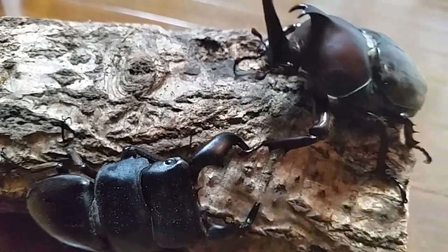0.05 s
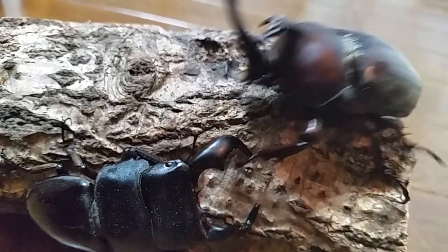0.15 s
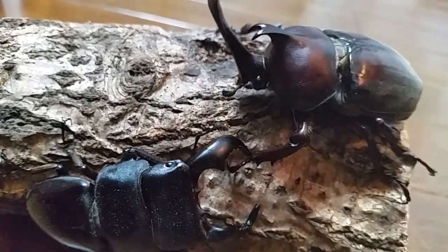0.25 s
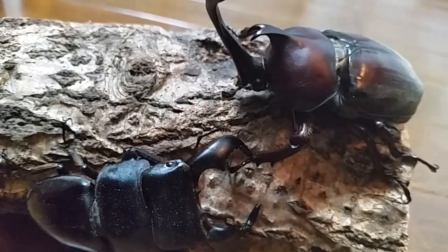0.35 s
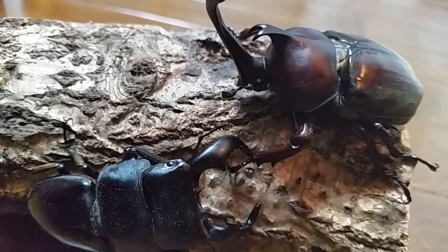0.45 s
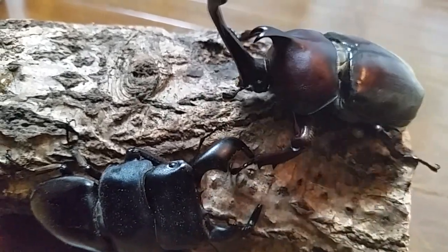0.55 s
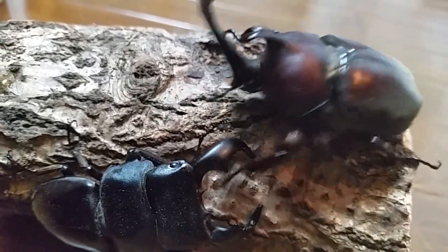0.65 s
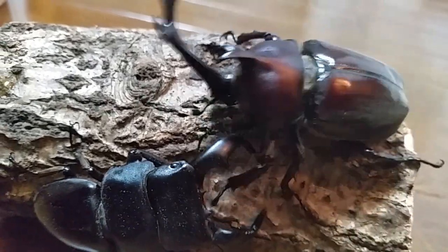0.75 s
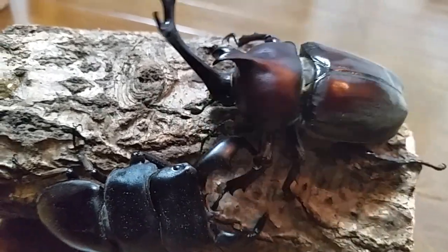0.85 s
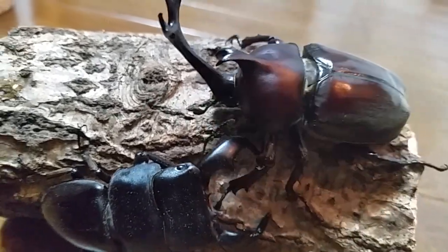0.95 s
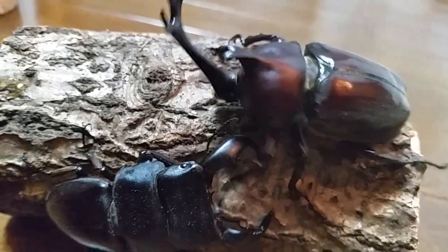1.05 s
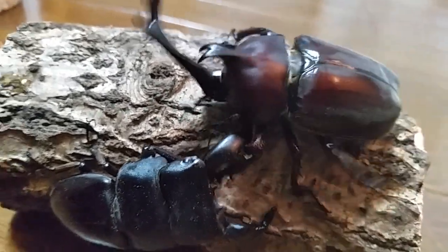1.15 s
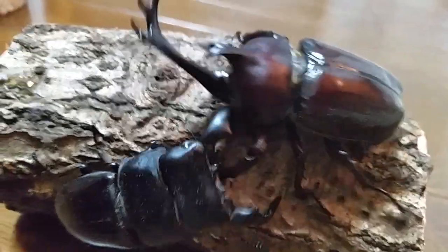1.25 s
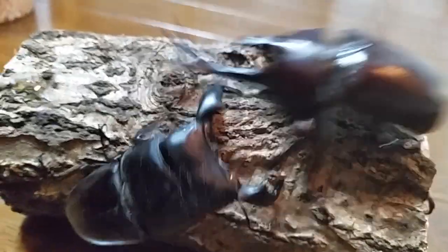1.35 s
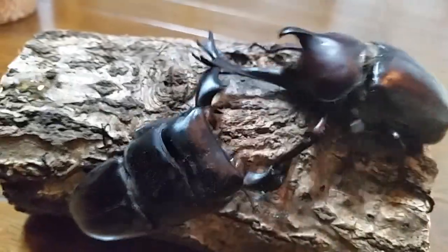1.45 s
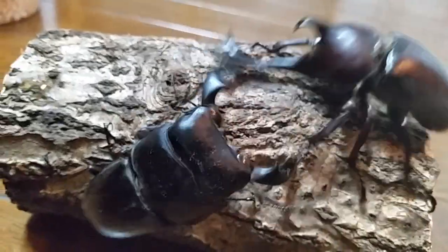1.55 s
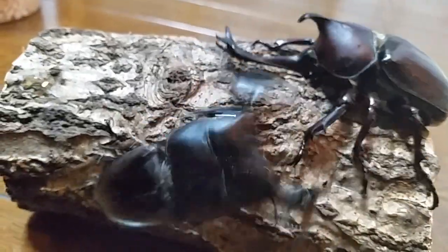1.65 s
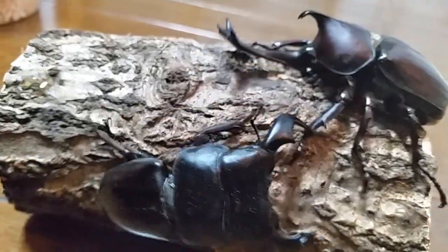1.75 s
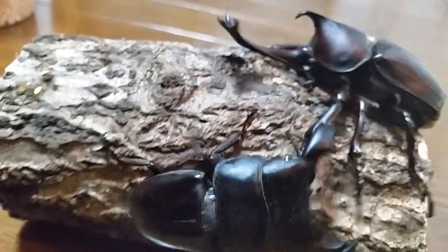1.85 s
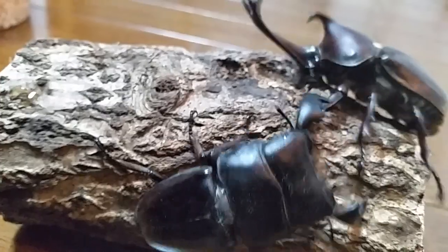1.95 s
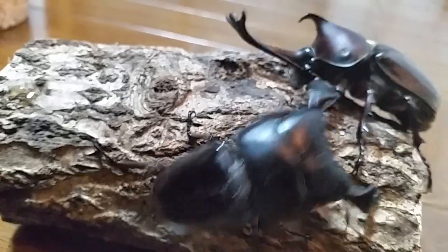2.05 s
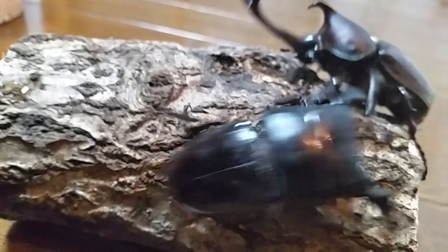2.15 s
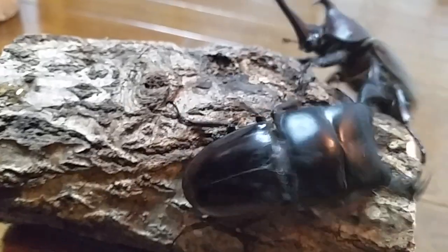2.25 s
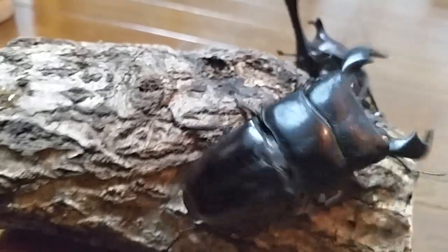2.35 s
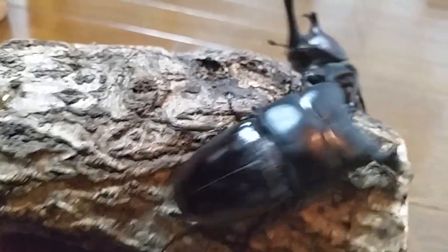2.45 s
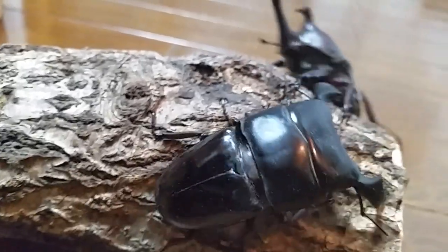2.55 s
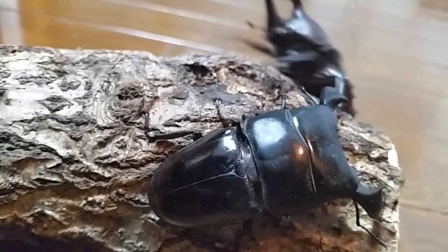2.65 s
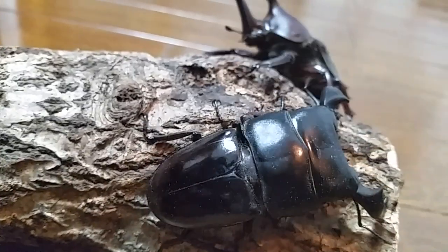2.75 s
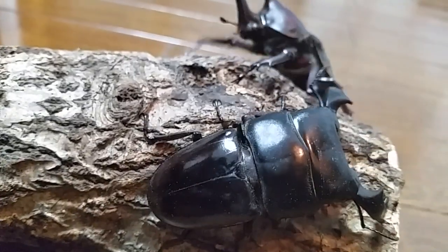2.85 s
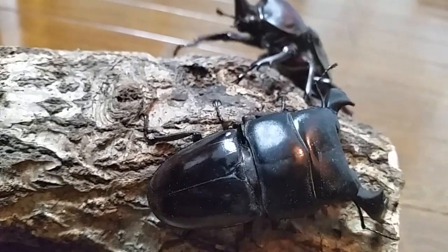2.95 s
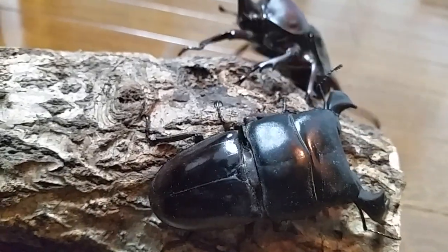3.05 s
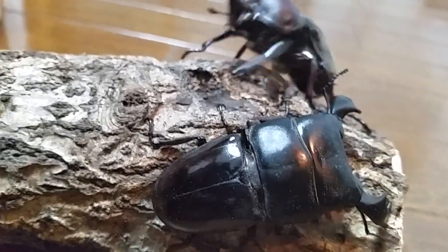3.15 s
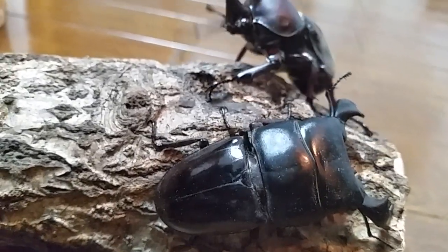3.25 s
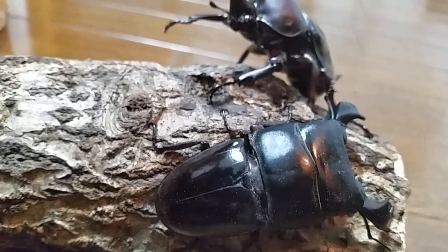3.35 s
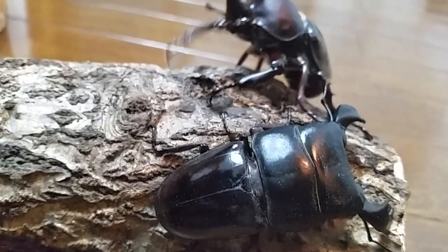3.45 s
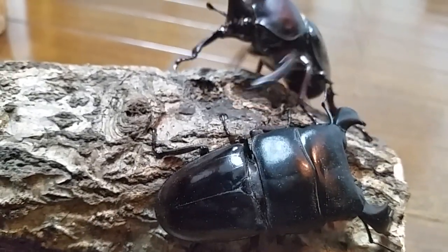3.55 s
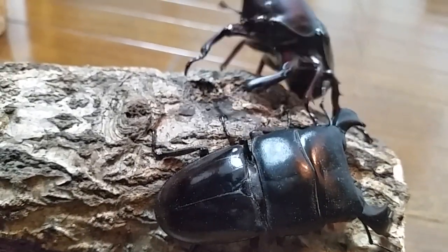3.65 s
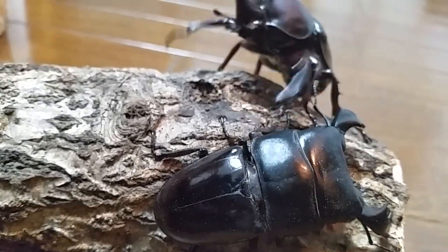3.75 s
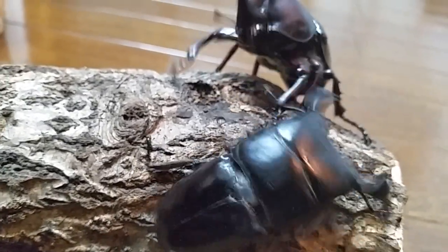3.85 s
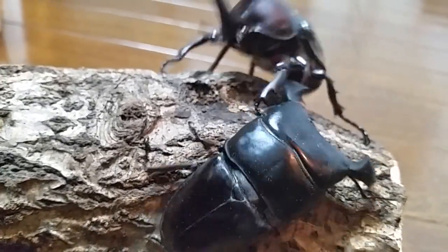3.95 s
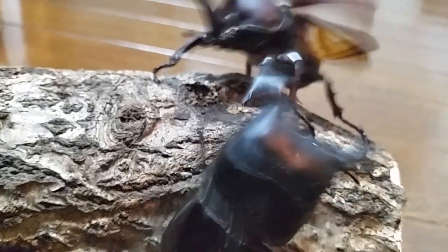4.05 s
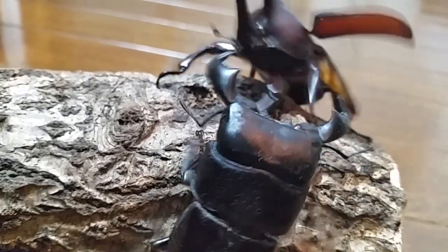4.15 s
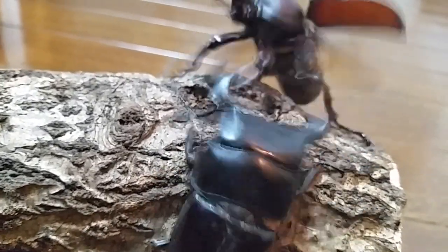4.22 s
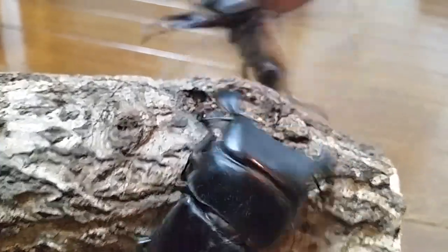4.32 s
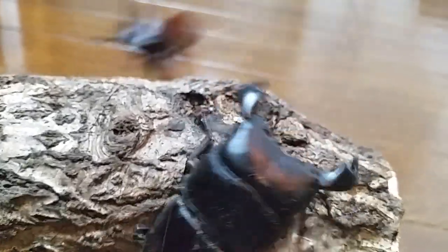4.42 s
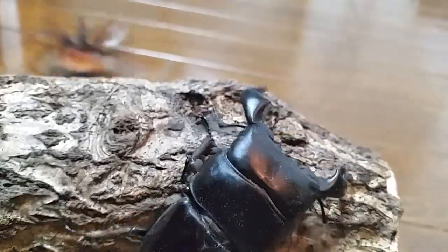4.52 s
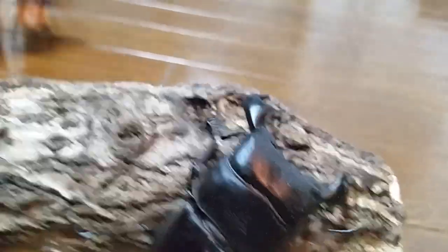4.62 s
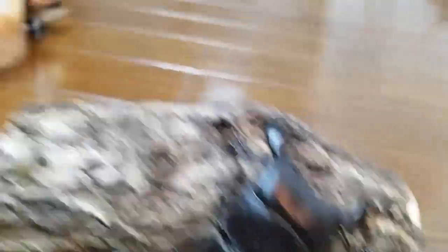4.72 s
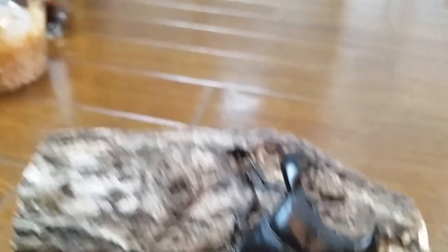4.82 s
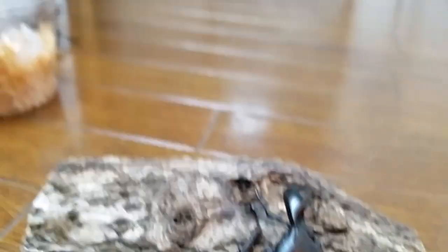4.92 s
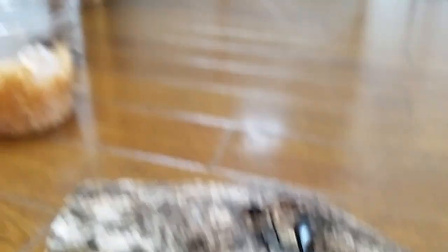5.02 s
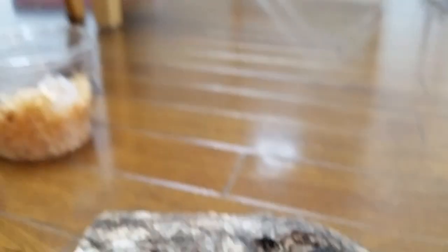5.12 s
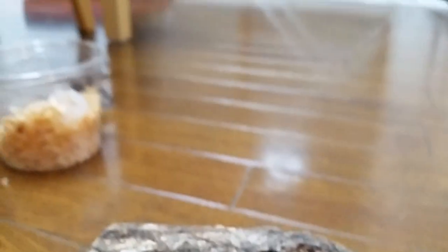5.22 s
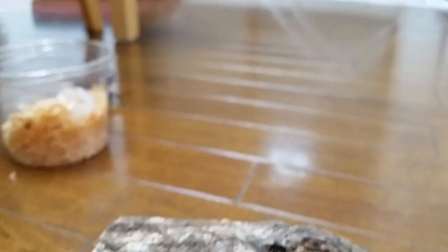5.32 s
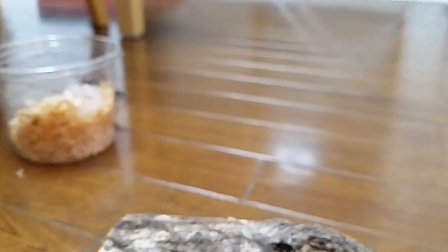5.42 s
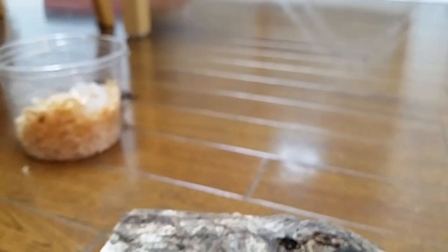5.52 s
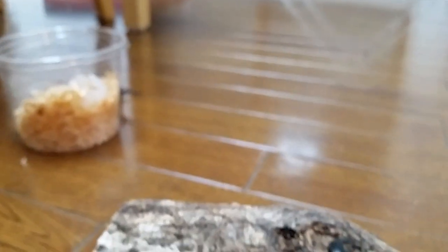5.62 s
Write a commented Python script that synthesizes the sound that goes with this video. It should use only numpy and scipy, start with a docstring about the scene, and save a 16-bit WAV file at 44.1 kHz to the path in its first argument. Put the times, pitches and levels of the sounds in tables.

```python
"""Beetle fight on a log

Two large beetles fight on a bark log on a wooden floor, close to a hand-held phone with two mic ports.
Claws tick and scrape; one beetle takes off, its wings humming and slapping log and floor at the
wing-beat rate, and its shell skids on the boards. Fingers bump the phone; a quiet room rumbles behind."""
import sys
import numpy as np
from scipy import signal
from scipy.fft import rfft, irfft
from scipy.io import wavfile
from scipy.ndimage import uniform_filter1d

SR = 44100
rng = np.random.default_rng(int(sys.argv[2]) if len(sys.argv) > 2 else 0)


def materialize(psi):
    """Save the field psi as 16-bit PCM at rate SR to the path in sys.argv[1].

    A 1-D psi becomes a single channel; in a 2-D psi each row is a channel.
    """
    bounded = np.clip(np.atleast_2d(psi).T, -1, 1)
    quanta = np.round(bounded * 32767).astype(np.int16)
    wavfile.write(sys.argv[1], SR, quanta)


N = 250488
TIME = np.arange(N) / SR
TAKES_OFF_S, LEAVES_LOG_S = 4.32, 4.59


def undb(db):
    return 10 ** (np.asarray(db) / 20)


def unit(x):
    return x / np.sqrt(np.mean(x ** 2))


def envelope(points):
    """Gain per sample from (t/s, level/dB) breakpoints."""
    return undb(np.interp(TIME, *np.transpose(points)))


def along(points, hz):
    """Read (f/Hz, value) breakpoints on a log-frequency axis."""
    freqs, values = np.transpose(points)
    return np.interp(np.log(hz + 1), np.log(freqs), values)


def sides(pan_db):
    """Left and right gains; positive pans left."""
    return undb(np.array([pan_db, -pan_db]) / 2)


def band(x, lo_hz, hi_hz):
    return signal.sosfilt(signal.butter(3, [lo_hz, hi_hz], "bandpass", fs=SR, output="sos"), x)


def walk(rate_hz):
    """Smooth random modulation with a spread near 1."""
    hold = int(SR / rate_hz)
    steps = np.repeat(rng.standard_normal(N // hold + 1), hold)[:N + hold]
    return 1.75 * uniform_filter1d(uniform_filter1d(steps, hold), hold)[:N]


# Wing hits: t/s, level/dB, shell ring/dB, log body/dB (both relative to level), pan/dB
WING_SLAPS = [(4.3135, -25, -4, -14, 10), (4.3322, -10.5, -3, -15, 1), (4.3534, -4.5, -15.5, -32, 1),
              (4.36, -21, -8, -17, -6), (4.382, -9, -4.5, -16.5, -0.5), (4.4085, -4.5, -17.5, -15.5, 0.5),
              (4.4124, -10, -5, -15.5, 2.5), (4.437, -17, -1, -10, 1.5), (4.4415, -7.5, -3.5, -17, 5),
              (4.465, -9, -4, -10, 2.5), (4.471, -16.5, -10.5, -26, -15), (4.4894, -13, -18, -19, -1),
              (4.4923, -15, -7, -16, -4), (4.499, -18, -14, -33, -7), (4.519, -9, -10, -13.5, 1.5),
              (4.5461, -18, -8.5, -6.5, 2), (4.5679, -12.5, -11, -23, -2.5), (4.5781, -15.5, -7, -12, 6),
              (4.5965, -3.5, -9.5, -31, 0), (4.6133, -8.5, -8, -28, -1.5), (4.621, -17, -4.5, -18, 0),
              (4.637, -27, -11, -22, -1), (4.6518, -25, -4, -29, -4.5), (4.67, -31, 1, -24, 2.5),
              (4.6908, -13.5, -14, -21, -7), (4.7102, -11.5, -9, -24, 3.5), (4.7219, -9.5, -5.5, -19, -4.5),
              (4.7298, -18, -5, -30, 1), (4.75, -13.5, -12, -21, 0), (4.9095, -7.5, -10.5, -25, 1.5),
              (4.937, -9, -10, -19.5, 2), (4.9649, -7.5, -11, -25, 1.5), (4.9897, -8, -8, -35, -1),
              (5.017, -12, -8, -31, -1), (5.045, -11, -5.5, -23, 0), (5.068, -13, -1, -38, 2.5),
              (5.091, -19.5, 3, -32, -0.5)]


def wing_slaps():
    """Wings and shell strike log and floor, mostly once a beat; bark rasps more than smooth boards."""
    starts, db, shell_db, log_db, pan_db = np.transpose(WING_SLAPS)
    on_log = starts < LEAVES_LOG_S
    return contacts(starts, db, pan_db, [log_db, shell_db, 0 * db, log_db - 5.5], snap_ms=0.17,
                    rasp_ms=np.where(on_log, 4.2, 3.0), rasp_db=np.where(on_log, -11, -13))


# Claw clicks: t/s, level/dB, shell ring/dB (relative to level)
CLAW_TICKS = [(0.0873, -47, -19), (0.1122, -55, -19), (0.2205, -45, -10), (0.2634, -50, -13),
              (0.2928, -41.5, -21), (1.2048, -49.5, 4), (1.2437, -35.5, -6), (1.304, -42, -9),
              (1.3195, -37, -18), (1.4035, -49, -12), (1.43, -39, -15), (1.436, -44, -18),
              (1.4512, -31, -4), (1.4552, -32, -24), (1.4635, -44, -15), (1.4695, -40, -15),
              (1.4775, -42, -15), (1.4896, -36, -12), (1.5205, -36, -20), (1.5425, -37, -7),
              (1.5455, -21, -31), (1.553, -33.5, -4), (1.6009, -31.5, -9), (1.607, -39, -5),
              (1.6215, -39, 3), (1.626, -38, -13), (1.629, -39, -8), (1.674, -40, 0), (1.681, -47, -20),
              (1.698, -41, -12), (1.7246, -35.5, -4), (1.741, -37, -7), (1.754, -26.5, -20),
              (1.7605, -28, -27), (1.7745, -29, -20), (1.8059, -32, -27), (1.8443, -29, -14),
              (1.8518, -31, -22), (1.8835, -40, -5), (1.8922, -33, -11), (1.9115, -31, -8),
              (1.9245, -28, -6), (1.9675, -43, -15), (1.984, -32, -23), (2.0395, -38, -2),
              (2.057, -34, -12), (2.112, -48, -8), (2.128, -45, -1), (2.1425, -39, -16), (2.153, -40, -3),
              (2.179, -42, -12), (2.2315, -42, -15), (2.2534, -27, -6.5), (2.3601, -32, -18),
              (2.3661, -27, -23), (2.3705, -27, -22), (2.384, -24.5, -22), (2.391, -27, -22),
              (2.4035, -26, -11), (2.4075, -30.5, 4), (2.415, -40, 0), (2.4225, -38, 3), (2.4365, -33, -8),
              (2.477, -38, -20), (2.5, -34, -16), (2.5123, -30, -12), (2.5367, -35.5, -8),
              (2.54, -33.5, -3.5), (2.577, -42, -12), (2.7054, -36.5, -5), (2.7413, -43, -19),
              (3.1708, -49, -13), (3.2681, -57, -12), (3.7869, -49, -24), (3.964, -37, -13),
              (3.9695, -37, -4), (3.975, -41, -2), (3.984, -60, -7), (4.0024, -33, -6.5), (4.0712, -39, -8),
              (4.0932, -28.5, -11), (4.1566, -30.5, -4), (4.183, -35, -23), (4.207, -43.5, 5),
              (4.2219, -41, -3), (4.2473, -32.5, -11), (4.2748, -23, -7.5), (4.291, -47, 3),
              (4.891, -28.5, -4), (5.116, -33, 7.5), (5.2436, -32, -3.5), (5.27, -46.5, 5), (5.449, -49, 8)]


def claw_ticks(strays=110):
    """Hooked claws let go of the bark one by one; thin tips give little bass."""
    # small random ticks ride on the level of the dragging
    when, size, tone = rng.random((strays, 3)).T
    stray_s = when * (N - 1) / SR
    drag_db, _ = drag_levels()
    stray_db = drag_db[(stray_s * SR).astype(int)] - 2.5 * np.log(1 - size)
    stray_ticks = np.transpose([stray_s, stray_db, -10 + 18 * (tone - .5)])
    starts, db, shell_db = np.vstack([CLAW_TICKS, stray_ticks]).T
    each = np.ones(len(starts))
    return contacts(starts, db, pan_db=1.9 * each, parts_db=[shell_db - 26.5, shell_db, 0 * db],
                    snap_ms=0.21, rasp_ms=4.1 * each, rasp_db=-12 * each)


# Ringing bands of log, shell, claw tips and the hollow under the log: low f/Hz, high f/Hz
RINGING_PARTS = [(430, 3860), (3760, 7750), (9170, 21300), (265, 763)]


def contacts(starts, level_db, pan_db, parts_db, snap_ms, rasp_ms, rasp_db, size=1024):
    """Each hit is a snap with a crackling rasp for a tail, layered over the ringing parts."""
    ms = np.arange(size) / SR * 1e3
    noise = rng.standard_normal((len(starts), 4, size))
    crackle = undb(3.5 * unit(uniform_filter1d(noise[:, 2], 24)))
    rasp = undb(rasp_db)[:, None] * crackle / (1 + (ms / rasp_ms[:, None]) ** 4)
    snap = ms / snap_ms * np.exp(1 - ms / snap_ms)
    hits = 0
    for part_db, (lo, hi) in zip(parts_db, RINGING_PARTS):
        blow = band(noise[:, 0] * snap, lo, hi)
        blow /= np.abs(blow).max(axis=1, keepdims=True)
        rubs = np.array([unit(band(noise[:, k], lo, hi)) for k in (1, 3)])  # one for each port
        hits = hits + undb(part_db)[:, None] * (1.87 * blow + rasp * rubs)
    out = np.zeros((2, N + 2 * size))
    for k, at in enumerate((starts * SR).astype(int)):
        lag = int(np.clip(2 * pan_db[k] + 5.5, -9, 9))  # samples between the ports
        gains = undb(level_db[k]) * sides(pan_db[k])
        for port, start in enumerate((at, at + lag)):
            out[port, start:start + size] += gains[port] * hits[port, k]
    return out[:, :N]


# Bark plates ringing under a dragged claw: low f/Hz, high f/Hz
BARK_PLATES = [(4000, 4640), (5400, 6700)]
# Lower and upper sizzle of the claw tips: low f/Hz, high f/Hz
TIP_RINGS = [(8300, 12500), (12300, 17700)]


def claw_scrape():
    """Dragged claws slip in fits and starts, catching now one bark plate, now another."""
    db, mid_db = drag_levels()
    fits = undb(db + 1.07 * walk(70) + 1.68 * walk(300))
    slips = rng.standard_normal((2, N)) * undb(3.5 * np.minimum(rng.exponential(size=N), 6))
    log, shell = (unit(band(slips, lo, hi)) for lo, hi in RINGING_PARTS[:2])
    plates = sum(undb(2.97 * walk(110)) * unit(band(slips, lo, hi)) for lo, hi in BARK_PLATES)
    plates = np.where(TIME < TAKES_OFF_S, plates, undb(2.5) * shell)  # the shell takes over at take-off
    tips = unit(sum(undb(1.8 * walk(90)) * band(slips, lo, hi) for lo, hi in TIP_RINGS))
    mids = undb(-4) * log + undb(-18.5) * shell + undb(-5) * plates
    return fits * (tips + undb(mid_db) * mids)


# Drags of claws and shell: t/s, hold/s, level/dB, mids/dB (relative to level)
DRAGS = [(0.0, 0.37, -69.5, -18), (0.728, 0.091, -69, -16), (1.306, 0.043, -53, -10),
         (1.397, 0.014, -47, -9), (1.464, .02, -55.5, -5), (1.5, .04, -55.5, -7), (1.57, 0.03, -46.5, -7.5),
         (1.61, 0.033, -51, -11), (1.665, 0.02, -50, -11.5), (1.752, 0.059, -46.5, -11.5),
         (1.828, 0.05, -56, -6.5), (1.916, 0.021, -38, -9), (1.945, .015, -49.5, -11),
         (2.017, 0.092, -47, -8.5), (2.137, 0.015, -46, -8), (2.197, 0.034, -49.5, -6.5),
         (2.269, 0.066, -42.5, -11.5), (2.363, 0.04, -43.5, -7.5), (2.408, 0.044, -46.5, -7.5),
         (2.473, 0.027, -52.5, -9), (2.529, 0.097, -52.5, -4.5), (2.687, 0.062, -55, -7),
         (3.19, 0.064, -70.5, -10), (3.965, 0.091, -56, -4.5), (4.095, 0.033, -49.5, -9.5),
         (4.164, 0.015, -47.5, -9), (4.205, 0.12, -50, -5.5), (4.344, 0.093, -39.5, 0.5),
         (4.459, 0.059, -32.5, -1.5), (4.536, 0.026, -40.5, 2), (4.602, 0.037, -30.5, -6.5),
         (4.706, 0.044, -29, -6.5), (4.899, 0.13, -38.5, -4.5), (5.065, 0.05, -32, -7.5),
         (5.194, 0.089, -51.5, 0), (5.439, 0.14, -62, 3)]


def drag_levels(attack_db_per_s=898, release_db_per_s=373.5, rest_db=-77.5):
    """Drag level and relative mids in dB: each drag bites fast, holds and eases off."""
    tips, mids = undb(rest_db) ** 2, undb(rest_db - 7.5) ** 2
    for start, hold, db, mid_db in DRAGS:
        attack_db = attack_db_per_s * np.maximum(start - TIME, 0)
        release_db = release_db_per_s * np.maximum(TIME - start - hold, 0)
        power = undb(db - attack_db - release_db) ** 2
        tips = tips + power
        mids = mids + power * undb(mid_db) ** 2
    return 10 * np.log10(tips), 10 * np.log10(mids / tips)


# Envelope of the wing hum: t/s, level/dB
HUM_ENVELOPE = [(4.32, -36), (4.38, -33.5), (4.45, -27.5), (4.49, -32.5), (4.545, -27.5), (4.59, -37),
                (4.63, -58), (4.7, -48), (4.72, -35), (4.79, -50), (5.11, -42), (5.15, -53)]
# Timbre of the hum: harmonic number, level/dB
HUM_HARMONICS = [(1, -14), (2, -4.5), (3, -4), (4, -2), (5, -6.5), (6, -11.5), (7, -17.5), (8, -17),
                 (9, -16.5), (10, -15)]


def wing_hum(beat_hz=37.72, downstroke_s=4.412):
    """Air pushed once a beat: a rough flutter whose harmonics waver, partly on their own at each port."""
    phase = 2 * np.pi * beat_hz * (TIME - downstroke_s) + 0.25 * walk(30)  # uneven strokes
    hum = 0
    for harmonic, db in HUM_HARMONICS:
        drift = 0.4 * walk(14) + np.array([0.2 * walk(16), 0.9 * walk(18)])
        hum = hum + undb(db + 2.2 * walk(22)) * np.cos(harmonic * phase + drift)
    flying = (TIME > HUM_ENVELOPE[0][0]) & (TIME < HUM_ENVELOPE[-1][0])
    gate = uniform_filter1d(flying.astype(float), 900)
    return unit(hum) * envelope(HUM_ENVELOPE) * gate * sides(1.7)[:, None]


def shell_slide(start_s=4.722, t60_s=.36):
    """The shell skids over the floorboards: a woody rub with a hard attack that dies away."""
    since = TIME - start_s
    fade = (since > 0) * np.exp(-np.log(1000) * np.abs(since) / t60_s)
    grain = undb(-32.5 + 1.8 * walk(300))
    return fade * grain * unit(band(rng.standard_normal((2, N)), 2200, 4500))


# Soft thumps on the phone: t/s, level/dB, f/Hz
PHONE_BUMPS = [(0.3257, -33.5, 141), (0.427, -40, 172), (0.588, -35.5, 234), (0.65, -32, 106),
               (1.007, -38, 197), (1.081, -38, 135), (1.946, -37.5, 122), (1.999, -37, 201),
               (2.03, -33.5, 156), (2.419, -35, 150), (5.48, -35, 121.3)]
# Finger taps on the case: t/s, level/dB, f/Hz, decay t60/s, crack/dB (relative to level)
FINGER_TAPS = [(0.424, -44, 355, 0.056, -31), (0.586, -44, 332, 0.084, -27), (4.063, -38.5, 524, 0.01, -16),
               (4.956, -32, 430, 0.018, -18), (5.101, -30.5, 450, 0.01, 1.5), (5.181, -33, 630, 0.014, -13),
               (5.306, -42, 583, 0.018, -14), (5.35, -31.5, 806, 0.0034, -3)]


def handling():
    """Fingers on the phone: dull bumps and, in opposite polarity, crisper taps."""
    bumps = knocks([(*row, 0.026) for row in PHONE_BUMPS], sharpness=5.1)  # one t60 for all bumps
    return knocks(FINGER_TAPS, sharpness=13) - bumps


def knocks(table, sharpness, pan_db=14.5, size=8192):
    """A push on the case rings briefly; a nail adds a crack."""
    out, t = np.zeros((2, N + size)), np.arange(size) / SR
    for start, db, hz, t60, *crack_db in table:
        decay = t * np.log(1000) / max(t60, .004)
        attack = 1 - np.exp(-sharpness * decay)
        ring = band(np.sin(2 * np.pi * hz * t) * attack * np.exp(-decay), 60, 4000)
        ring /= np.abs(ring).max()
        if crack_db:
            crack = band(rng.standard_normal(size) * np.exp(-t / 0.0012), 460, 2540)
            ring += undb(crack_db[0]) * crack / np.abs(crack).max()
        at = int(start * SR)
        out[:, at:at + size] += undb(db) * sides(pan_db)[:, None] * ring
    return out[:, :N]


# EQ of the room rumble: f/Hz, level/dB
RUMBLE_EQ = [(15, -48), (25, -11.5), (48, -8), (65, -9.5), (86, 0), (113, -8), (200, -5.5), (270, -15.5),
             (658, -19), (1010, -21.5), (1270, -22.5), (2450, -30.5), (4000, -45), (5200, -78),
             (8800, -120)]
# Slow fader ride on the rumble: t/s, level/dB
RUMBLE_ENVELOPE = [(0.0, -48), (1.1, -45), (2.4, -44.5), (3.6, -47), (5.68, -45.5)]
# How mono the rumble is: f/Hz, correlation (clipped to 0-1)
RUMBLE_CORRELATION = [(60, 0.63), (130, 1), (290, 0.69), (640, 0.26), (1410, 1), (3100, -1.4),
                      (6820, -0.21), (15000, 0.02)]
# Where the rumble leans: f/Hz, pan/dB
RUMBLE_PAN = [(60, 1), (110, 0), (200, 1), (380, 2.5), (700, 5.5), (1290, -2.5), (2380, 6.5), (4400, -1.5),
              (8120, 13), (15000, 22)]


def room_rumble():
    """A quiet room bed; the bass is mostly shared by the ports and sways in level."""
    hz = np.fft.rfftfreq(N, 1 / SR)
    alike = np.clip(along(RUMBLE_CORRELATION, hz), 0, 1)
    mid, side = rfft(rng.standard_normal((2, N)))
    spectrum = np.sqrt(1 + alike) * mid + np.sqrt(1 - alike) * side * np.array([[1], [-1]])
    bed = unit(irfft(spectrum * undb(along(RUMBLE_EQ, hz)) * sides(along(RUMBLE_PAN, hz)), N))
    sway = undb(1.7 * walk(14) + 1.1 * np.array([walk(7), walk(6)]))
    return envelope(RUMBLE_ENVELOPE) * (bed + (sway - 1) * band(bed, 55, 430))


# Envelope of the narrow hiss: t/s, level/dB
SWELL_ENVELOPE = [(0.4, -68.5), (0.98, -61), (1.8, -69.5), (2.3, -69), (3.2, -71)]


def hiss_swell():
    """A soft, narrow band of hiss, wide in stereo, that swells once."""
    return envelope(SWELL_ENVELOPE) * unit(band(rng.standard_normal((2, N)), 2280, 2730))


# EQ of the noise floor: f/Hz, level/dB
HISS_EQ = [(1760, -19), (3000, -14), (3340, -14.5), (4440, -1), (4800, -8), (7530, -30), (15100, -3),
           (16200, -29), (16500, -41.5)]


def mic_hiss(level_db=-74.5):
    """Faint microphone hiss, separate at each port."""
    colour = undb(along(HISS_EQ, np.fft.rfftfreq(N, 1 / SR)))
    return undb(level_db) * unit(irfft(rfft(rng.standard_normal((2, N))) * colour, N))


def room_reverb(sound, t60_s=0.3, wet_db=-17):
    """Floor and walls answer after 2 ms, differently at each port."""
    t = np.arange(SR // 2) / SR
    tail = rng.standard_normal((2, len(t))) * np.exp(-t * np.log(1000) / t60_s) * (t > .002)
    tail *= undb(wet_db) / np.sqrt(np.sum(tail ** 2, axis=1, keepdims=True))
    return signal.fftconvolve(sound, tail, axes=1)[:, :N]


# EQ of the left and right mic ports for sound from the log: f/Hz, level/dB
LEFT_PORT_EQ = [(1300, -5.5), (2200, -3), (3000, -7.5), (3800, -8.5), (5000, -11.5), (6200, -11),
                (7200, -14.5), (8300, -18.5), (9500, -4), (11500, 4.5), (13500, -0.5), (15500, -5)]
RIGHT_PORT_EQ = [(1300, -2.5), (2200, -3.5), (3000, -2), (3800, 0.6), (5000, 0.5), (6200, 3.5),
                 (7200, -7.5), (8300, -13), (9500, -9), (11500, 4), (13500, -3), (15500, -4.5)]


def mic_ports(sound, size=512):
    """Each port colours the sound like a minimum-phase EQ."""
    hz = np.fft.rfftfreq(size, 1 / SR)
    gains = undb([along(LEFT_PORT_EQ, hz), along(RIGHT_PORT_EQ, hz)])
    cepstrum = irfft(np.log(gains), size)
    cepstrum[:, 1:size // 2] *= 2  # folding the cepstrum makes the response causal
    cepstrum[:, size // 2 + 1:] = 0
    impulses = irfft(np.exp(rfft(cepstrum)), size)
    return signal.fftconvolve(sound, impulses, axes=1)[:, :N]


def scene():
    """Hits and scrapes pass through room and ports; hum, handling and the noise beds go in direct."""
    fight = claw_ticks() + wing_slaps() + claw_scrape() + shell_slide()
    heard = mic_ports(fight + room_reverb(fight))
    return heard + wing_hum() + handling() + room_rumble() + mic_hiss() + hiss_swell()


def record(dry, top_hz=15750):
    """The phone soft-clips the loudest peaks and cuts the top."""
    rounded = .7 * np.tanh(dry / .7)
    return signal.sosfilt(signal.ellip(8, .2, 60, top_hz, fs=SR, output="sos"), rounded)


dry = scene()
out = record(dry)
materialize(out)
```